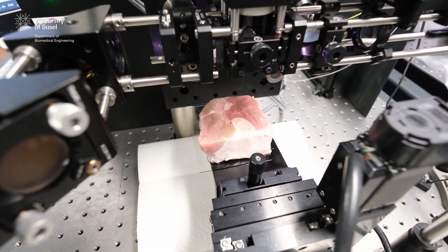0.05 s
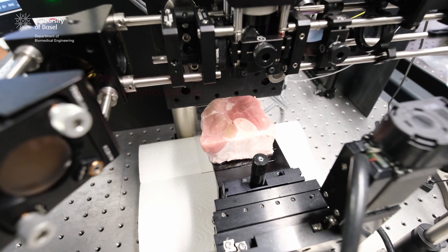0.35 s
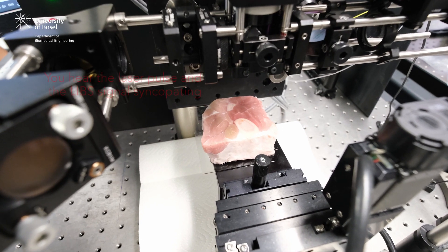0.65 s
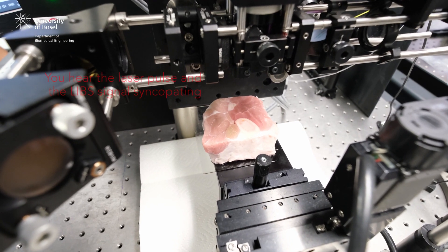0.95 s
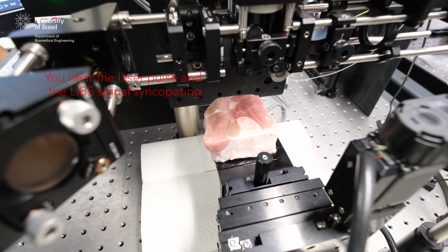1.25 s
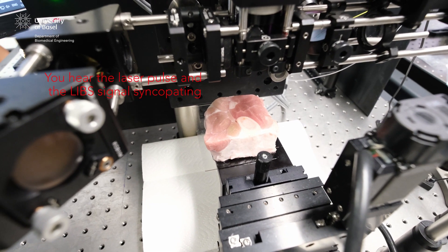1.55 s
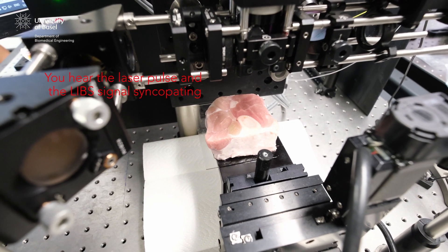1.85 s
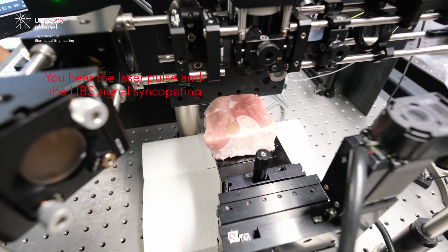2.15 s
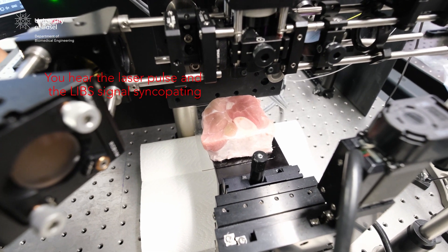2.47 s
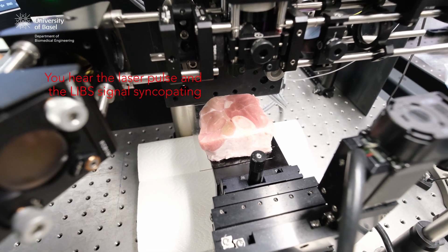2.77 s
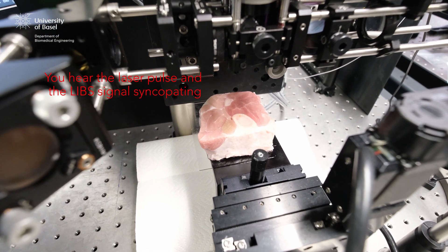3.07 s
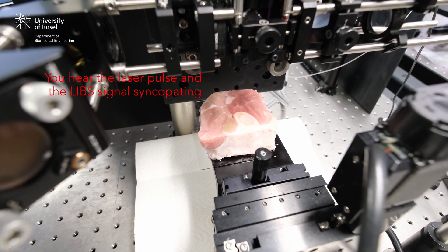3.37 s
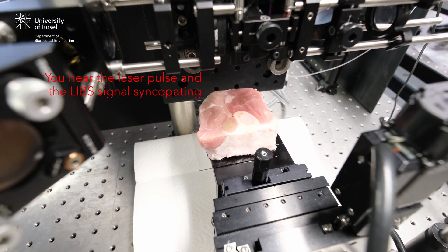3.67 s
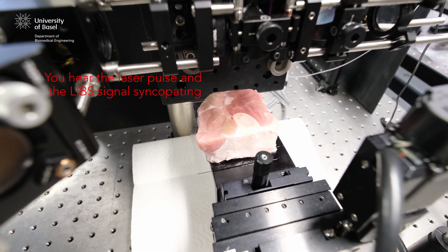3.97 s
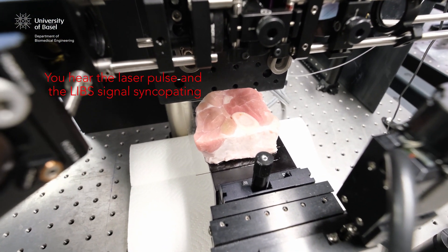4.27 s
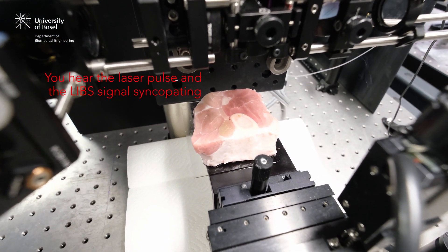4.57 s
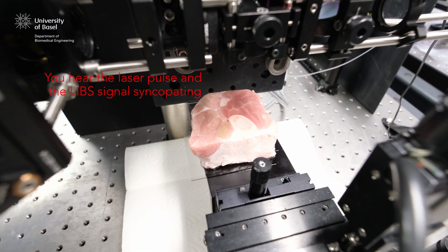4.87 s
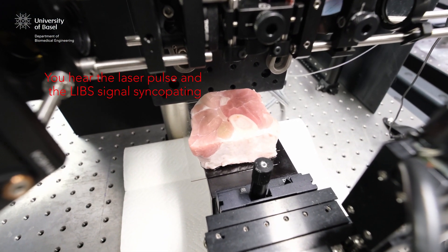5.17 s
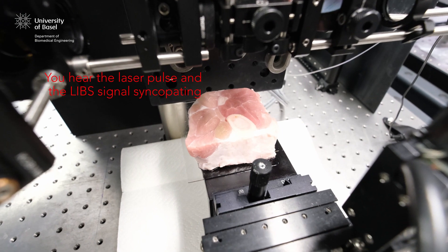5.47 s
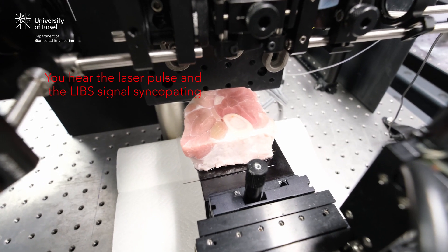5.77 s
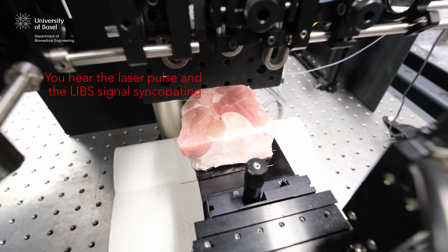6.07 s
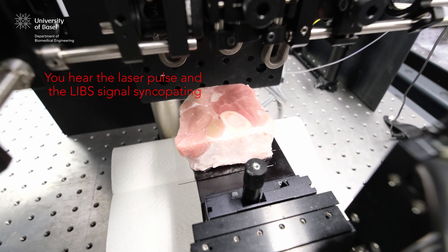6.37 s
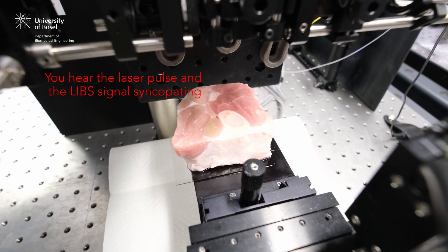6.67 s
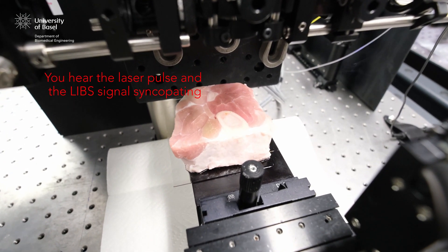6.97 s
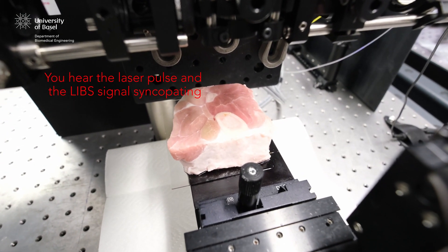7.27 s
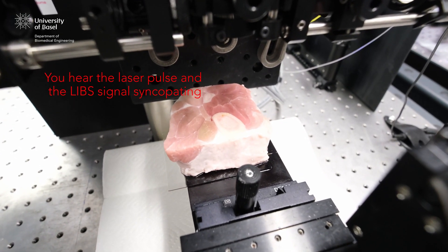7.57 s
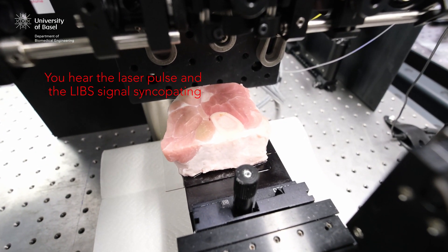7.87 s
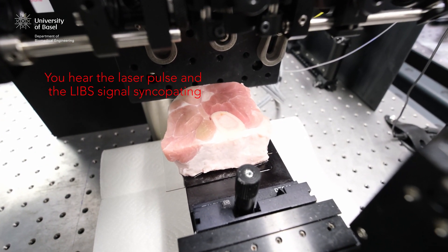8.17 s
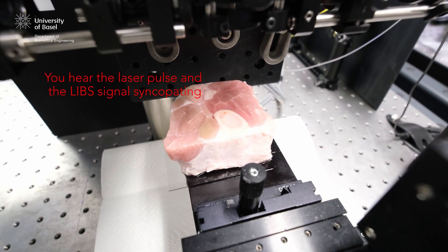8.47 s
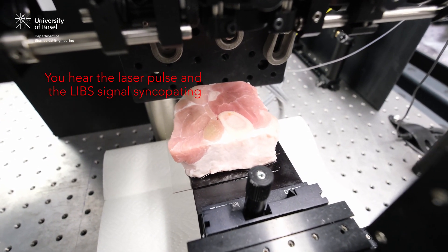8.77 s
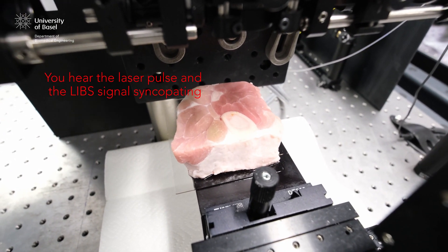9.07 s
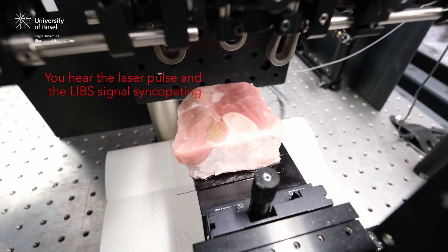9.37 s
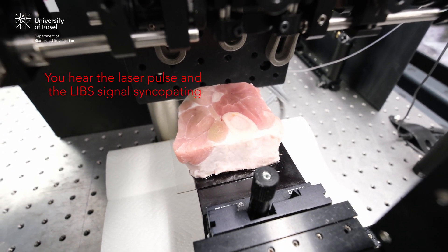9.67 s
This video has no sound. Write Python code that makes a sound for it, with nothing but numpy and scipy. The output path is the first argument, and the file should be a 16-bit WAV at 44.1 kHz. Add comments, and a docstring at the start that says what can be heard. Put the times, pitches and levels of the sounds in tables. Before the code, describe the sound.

Sharp, bright cracks of a laser blasting bone repeat evenly, one per second, in a laboratory with a short echo. A lighter, dry tick leads every crack but the first, making a limping tick-snap rhythm. Underneath run rushing fan air, pump tones and a buzzing power supply with a faint whine, which slowly rises in level as the microphone approaches. Each crack clips and briefly pushes the hum down.

```python
"""Cooling fans, a pump and a buzzing power supply hum in a laboratory, and almost at once a violent snap
cuts in: a pulsed laser blasting bone on an optical bench, once a second. From the second snap on, a weaker
laser's dry tick comes a fifth of a second ahead. Each snap overloads a hand-held camera's microphone;
the gain control ducks, then lets the room swell back. The buzz grows as the camera moves in."""
import sys
import numpy as np
from scipy import signal
from scipy.fft import rfft, irfft, next_fast_len
from scipy.io import wavfile
from scipy.ndimage import minimum_filter1d, map_coordinates

SR = 44100
rng = np.random.default_rng(int(sys.argv[2]) if len(sys.argv) > 2 else 0)


def to_wav(sig):
    """Store sig (one row per channel, or 1-D mono) as 16-bit WAV at the path in sys.argv[1].

    Samples outside -1..1 are clipped; the rate is SR.
    """
    pcm = np.clip(np.atleast_2d(sig), -1, 1) * 32767
    pcm = np.round(pcm).astype(np.int16)
    wavfile.write(sys.argv[1], SR, pcm.T)  # frames by channels


N = 433503
TOP_HZ = 16400  # top of the camera's band


def amp(db):
    """Decibels to gain."""
    return 10 ** (np.asarray(db) / 20)


def unit(x):
    """Scale to rms 1."""
    return x / np.sqrt(np.mean(x ** 2) + 1e-20)


def at_hz(curve, hz):
    """Read (Hz, value) points on a log frequency axis."""
    freqs, values = np.transpose(curve)
    return np.interp(np.log(hz + 1), np.log(freqs + 1), values)


def at_time(curve, s):
    """Read (seconds, value) points at time s."""
    return np.interp(s, *np.transpose(curve))


def wobble(rate):
    """A smooth random curve with `rate` knots a second."""
    knots = rng.standard_normal(int(N * rate / SR) + 4)
    positions = np.arange(N // 64 + 1) * 64 * rate / SR
    return map_coordinates(knots, [positions]).repeat(64)[:N]


def noise(colour, size):
    """Coloured noise of rms 1."""
    padded = next_fast_len(size + 8192)
    white = rfft(rng.standard_normal(size), padded)
    eq = amp(at_hz(colour, np.fft.rfftfreq(padded, 1 / SR)))
    return unit(irfft(white * eq, padded)[:size])


def click(colour, size=1024):
    """The sharpest causal pulse with this colour, peak 1."""
    eq = amp(at_hz(colour, np.fft.rfftfreq(size, 1 / SR)))
    cepstrum = irfft(np.log(eq))
    cepstrum[1:size // 2] *= 2  # fold to minimum phase
    cepstrum[size // 2 + 1:] = 0
    pulse = irfft(np.exp(rfft(cepstrum)))
    return pulse / np.abs(pulse).max()


def add(track, s, sound):
    """Mix a sound in at time s."""
    part = track[round(s * SR):][:len(sound)]
    part += sound[:len(part)]


def machine_tone(hz, wander_hz, flutter_db=0.8):
    """A slightly unsteady sine of rms 1."""
    phase = 2 * np.pi * np.cumsum(hz + wander_hz * wobble(20)) / SR
    return unit(np.sin(phase) * amp(flutter_db * wobble(10)))


# The camera's move in on the bone. Each row: time in seconds, closeness from 0 (far) to 1 (near).
CAMERA_MOVE = [(2.6, 0), (4.1, 0.25), (5.2, 0.55), (7.2, 0.78), (9.2, 1)]

def approach(far_db, near_db, s):
    """A source's level in dB at time s, riding from far to near with the camera."""
    return far_db + (near_db - far_db) * at_time(CAMERA_MOVE, s)


# The dark wash of fan air. Each row: frequency in Hz, relative level in dB.
AIR_COLOUR = [(10, 9), (30, -11), (65, -20), (140, -14.5), (300, 0), (450, -3.5), (800, -8.5),
              (1500, -14.5), (2200, -21.5), (3800, -23.5), (5500, -29.5), (8500, -35), (10700, -43.5),
              (15700, -46.5)]
# The main hum of pump and fans. Each row: pitch in Hz, wander in Hz, far level in dB, near level in dB,
# dip at the node in dB.
PUMP_TONES = [(674, 1.5, -47, -47.3, 11), (1011, 2, -48.5, -68, 5), (1349, 3, -55, -54.5, 0),
              (2362, 2.5, -63.5, -58.5, 1), (565, 7, -49, -54.5, 16)]
# Fainter steady tones of the other equipment. Each row: pitch in Hz, relative level in dB.
EQUIPMENT_TONES = [(181, -57), (215, -57), (312, -52), (628, -56), (1262, -60), (1322, -62), (1527, -63),
                   (1797, -66), (1985, -65), (2023, -65), (2475, -70), (2623, -70), (2994, -69),
                   (3034, -65), (3369, -70), (3969, -71), (4046, -67), (4383, -72), (4586, -74),
                   (4680, -74), (4719, -71), (5015, -76), (7303, -77), (8045, -80)]

def fans_and_pump(pump_trim_db=0.02, equipment_trim_db=-0.87, node_s=3.67, node_width_s=1.47):
    """Rushing air and rotor tones; the low ones dip as the camera crosses a node of their standing waves."""
    t = np.arange(N) / SR
    air = amp(approach(far_db=-38, near_db=-40, s=t)) * noise(AIR_COLOUR, N)
    in_node = np.exp(-((t - node_s) / node_width_s) ** 2)
    pump = np.zeros(N)
    for hz, wander_hz, far_db, near_db, dip_db in PUMP_TONES:
        level_db = pump_trim_db + approach(far_db, near_db, t) - dip_db * in_node
        pump += amp(level_db) * machine_tone(hz, wander_hz)
    equipment = sum(amp(db + equipment_trim_db) * machine_tone(hz, wander_hz=1.81)
                    for hz, db in EQUIPMENT_TONES)
    return air + pump + equipment


# The thin, peaky buzz of the supply. Each row: frequency in Hz, relative level in dB.
BUZZ_COLOUR = [(2000, -19.5), (3200, 7.5), (4300, 5), (4900, -0.5), (5330, 9), (5600, -4.5), (6250, 10.5),
               (6720, -36), (6950, 8.5), (9200, 5), (9500, -16.5), (10200, -3), (10700, -37),
               (11900, -10.5), (15000, -31)]

def power_supply(buzz_hz=231.48, whine_harmonic=17):
    """Evenly spaced charging pulses make a buzz; one overtone sings out at a level of its own."""
    t = np.arange(N) / SR
    phase = 2 * np.pi * buzz_hz * t
    harmonic_hz = buzz_hz * np.arange(TOP_HZ // buzz_hz)
    _, harmonics = signal.freqz(click(BUZZ_COLOUR), worN=harmonic_hz, fs=SR)
    harmonics[whine_harmonic] = 0  # leave a slot for the whine
    cycle = irfft(harmonics, 4096)
    cycle_phase = np.linspace(0, 2 * np.pi, len(cycle), endpoint=False)
    pulses = np.interp(phase, cycle_phase, cycle, period=2 * np.pi)
    buzz = amp(approach(far_db=-56.5, near_db=-52, s=t)) * unit(pulses)
    whine = amp(approach(far_db=-64.5, near_db=-57.3, s=t)) * unit(np.sin(whine_harmonic * phase))
    return buzz + whine


def blast_times(first_s=0.13547, period_s=0.99996):
    """When the strong laser fires: each shot is one snap."""
    return np.arange(first_s, N / SR, period_s)


def blast_fronts(level_db=11, ring_hz=10000, t60=0.00082, bounce_s=0.00025, bounce_db=1):
    """The snap's attack: a steep front jolts the diaphragm, and its bounce off the bone follows at once."""
    out, t = np.zeros(N), np.arange(SR // 500) / SR
    jolt = -np.sin(2 * np.pi * ring_hz * t) * amp(level_db - 60 * t / t60)
    for s in blast_times():
        add(out, s, jolt)
        add(out, s + bounce_s, amp(bounce_db) * jolt)
    return out


# The bright, wide crack of a blast. Each row: frequency in Hz, relative level in dB.
CRACK_COLOUR = [(100, -10), (600, -11), (1500, -4), (2200, -0.5), (2900, -7.5), (5200, -7), (7500, -1),
                (11000, -8), (13000, -5), (14700, -1.5), (16500, -4.5)]

def blast_cracks(t60=0.012):
    """The snap's body: the shock wave scatters among the optics mounts for a few milliseconds."""
    out, t = np.zeros(N), np.arange(SR // 5) / SR
    for s in blast_times():
        envelope = amp(approach(far_db=0, near_db=8, s=s) - 60 * t / t60)
        add(out, s, envelope * noise(CRACK_COLOUR, len(t)))
    return out


# How hard a blast pushes on the moving microphone. Each row: time in seconds, push (negative is suction).
BLAST_PUSH = [(3.6, -3.5), (5.1, -1.6), (6.2, -1.53), (8.15, -1.0), (9.1, 0.68)]

def blast_thumps(rise_s=0.00017, stuck_s=0.0035, let_go_s=0.0016):
    """The snap's low end: the blast pins the microphone to one side until the pressure fades."""
    out, t = np.zeros(N), np.arange(SR // 20) / SR
    pinned = (1 - np.exp(-t / rise_s)) / (1 + np.exp((t - stuck_s) / let_go_s))
    for s in blast_times():
        add(out, s, at_time(BLAST_PUSH, s) * pinned)
    return out


# The hissy reverb tail. Each row: frequency in Hz, relative level in dB.
TAIL_COLOUR = [(200, -3), (2000, -9), (4000, -0.5), (6500, 5), (9000, 6.5), (12000, 4), (16000, 2)]
# How long the room rings. Each row: frequency in Hz, seconds to fall by 60 dB.
ROOM_T60 = [(300, 0.42), (3000, 0.47), (7000, 0.37), (11000, 0.27), (15000, 0.23)]

def room_tails(build_s=0.023):
    """The laboratory answers each blast with a smooth, bright hiss whose top dies first."""
    out = np.zeros(N)
    for s in blast_times():
        hz, t, hiss = signal.stft(noise(TAIL_COLOUR, SR // 2), SR, nperseg=256)
        swell = 1 - np.exp(-t / build_s)
        decay = amp(-60 * t / at_hz(ROOM_T60, hz)[:, None])
        _, tail = signal.istft(hiss * swell * decay, SR, nperseg=256)
        add(out, s, amp(approach(far_db=-13, near_db=-18.5, s=s)) * tail)
    return out


# The dry, midrange tick. Each row: frequency in Hz, relative level in dB.
TICK_COLOUR = [(100, -16), (300, -34), (520, -17.5), (750, 3), (1100, 1.5), (1600, 0), (2200, -11.5),
               (3100, 1), (4300, 0), (5400, -9), (8000, -17), (11000, -28.5), (15500, -26)]
# The accents of the ticks. Each entry: one shot's relative level in dB.
TICK_ACCENTS = [-4, -6, -7, -1, -2.5, -3, -2.5, -1.5, 1]

def laser_ticks(level_db=1, lead_gain=0.19, scatter_s=0.000997, scatter_db=-16, t60=0.013):
    """The weaker laser's small shock: two opposite fronts, trailed by reflections from the bench."""
    first_s, period_s = 0.9237, 0.99918  # slightly faster than the snaps, so it drifts away from them
    out, edge = np.zeros(N), click(TICK_COLOUR)
    t = np.arange(len(edge)) / SR
    shock = np.roll(edge, 16) - lead_gain * edge  # the weak, inverted front leads by about 0.4 ms
    shock /= np.abs(shock).max()
    for s, accent_db in zip(np.arange(first_s, N / SR, period_s), TICK_ACCENTS):
        add(out, s, amp(accent_db + level_db) * shock)
        scatter = amp(accent_db + scatter_db - 60 * t / t60) * noise(TICK_COLOUR, len(t))
        add(out, s + scatter_s, scatter)
    return out


def scene():
    """The mono mix: snaps, ticks and room tails over the bed of machines."""
    snaps = blast_fronts() + blast_cracks() + blast_thumps()
    return (snaps + laser_ticks() + room_tails() + fans_and_pump() + power_supply())[None]


def gain_control(x, threshold=0.019, depth_db=37, knee=0.74, lag_s=0.00601, hold_s=0.05, release_s=0.059):
    """The gain ducks with the recent load, a little for a tick, far for a blast; it holds, then recovers."""
    window = SR // 125  # 8 ms
    load = signal.lfilter(np.ones(window) / window, 1, np.minimum(np.abs(x), 1))
    cut_db = depth_db * np.maximum(load - threshold, 0) ** knee
    hold_size = int(hold_s * SR) | 1
    held_db = -minimum_filter1d(-cut_db, hold_size, origin=hold_size // 2)
    # every cut dies away exponentially, and the deepest one still alive sets the gain
    fade = np.arange(N) / SR / release_s
    released_db = np.exp(np.maximum.accumulate(np.log(held_db + 1e-9) + fade) - fade)
    late_db = np.pad(released_db, (int(lag_s * SR), 0))[:N]
    return amp(-late_db)


def rebound(x, share=0.65, settle_s=0.054):
    """The input blocks much of any steady pressure, so a one-sided push swings slowly back."""
    pole = np.exp(-1 / (settle_s * SR))
    slow_pressure = signal.lfilter([(1 - pole) ** 2], np.poly([pole, pole]), x)
    return x - share * slow_pressure


def record(dry):
    """The camera's chain: gain control, clipping at full scale, slow rebound and band limit."""
    clipped = np.clip(dry[0] * gain_control(dry[0]), -1, 1)
    low_pass = signal.cheby2(14, 90, TOP_HZ + 1000, fs=SR, output="sos")
    return signal.sosfilt(low_pass, rebound(clipped))[None]


dry = scene()
out = record(dry)
to_wav(out)
```